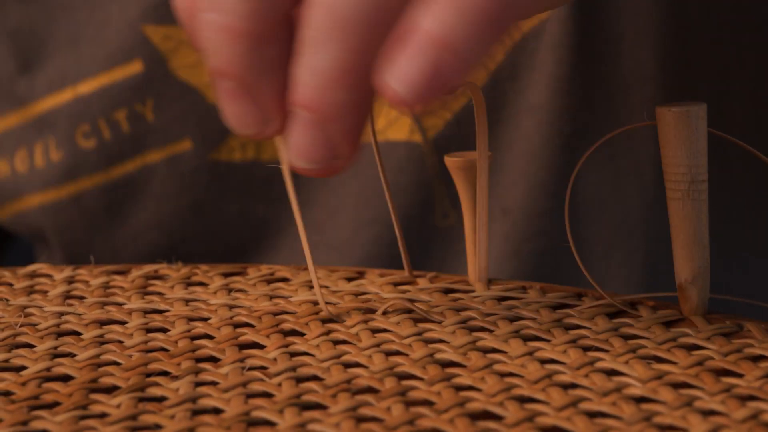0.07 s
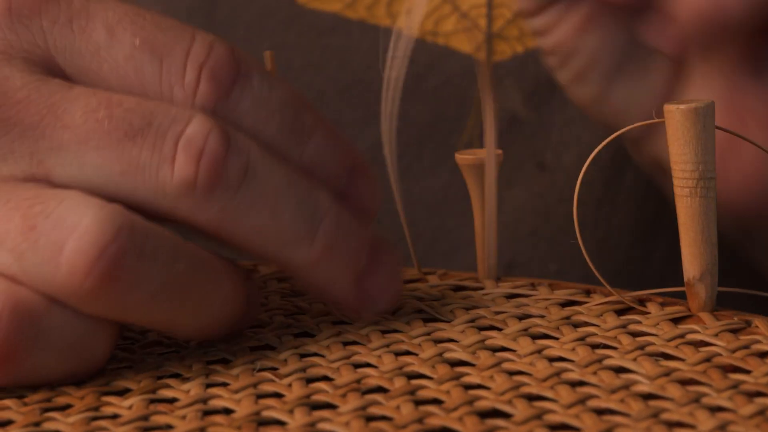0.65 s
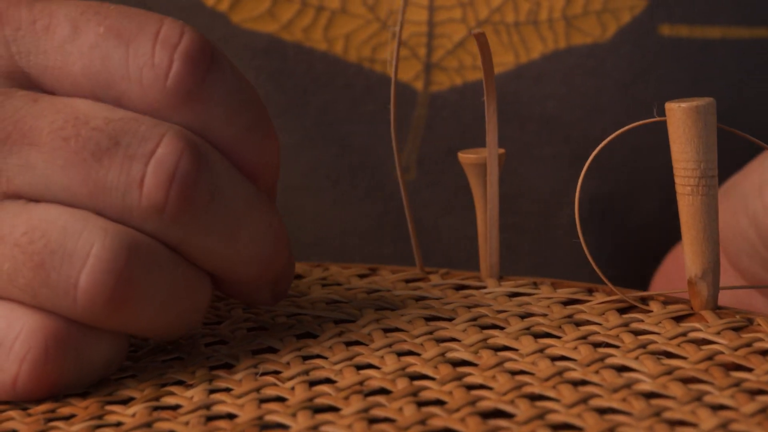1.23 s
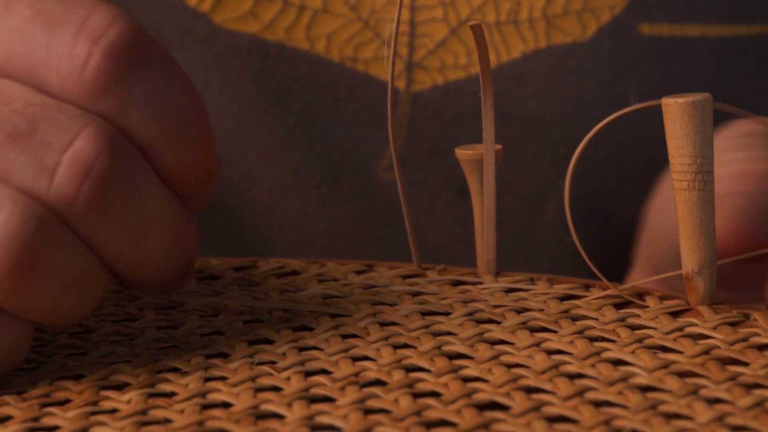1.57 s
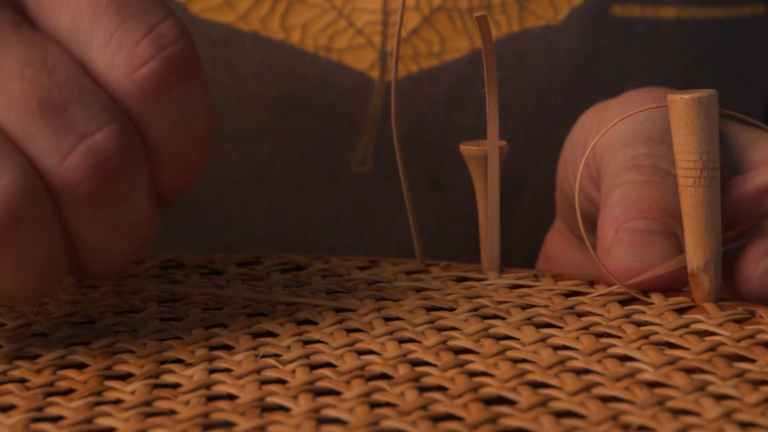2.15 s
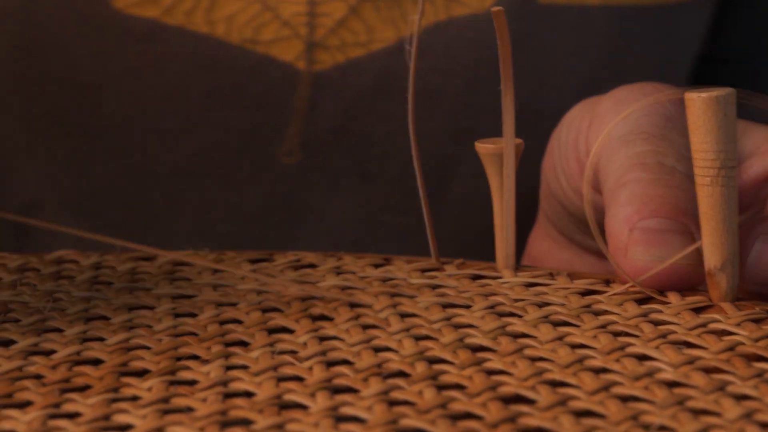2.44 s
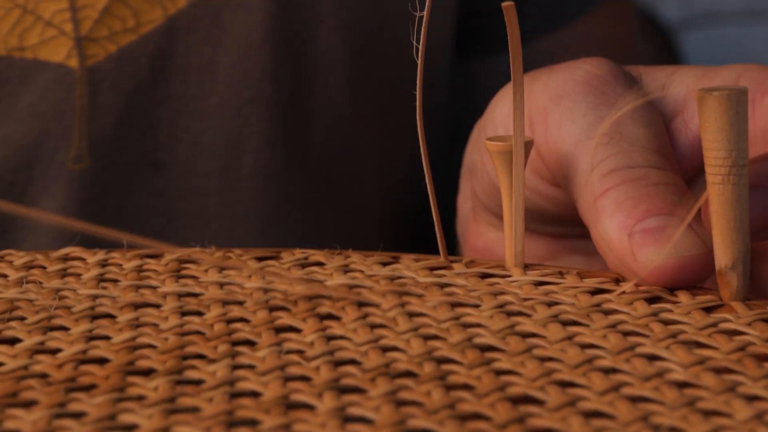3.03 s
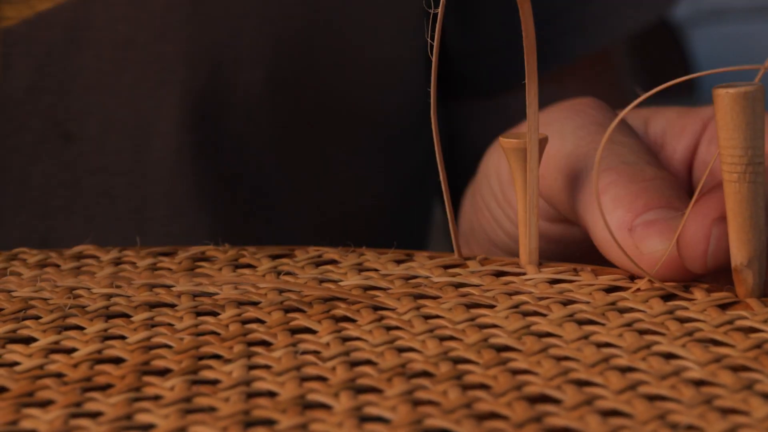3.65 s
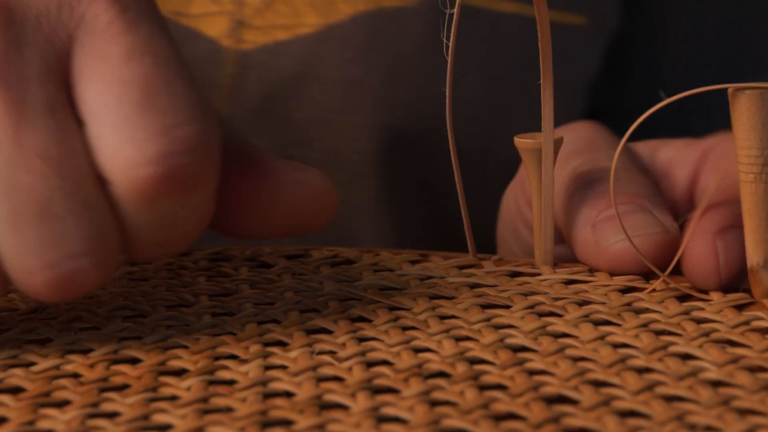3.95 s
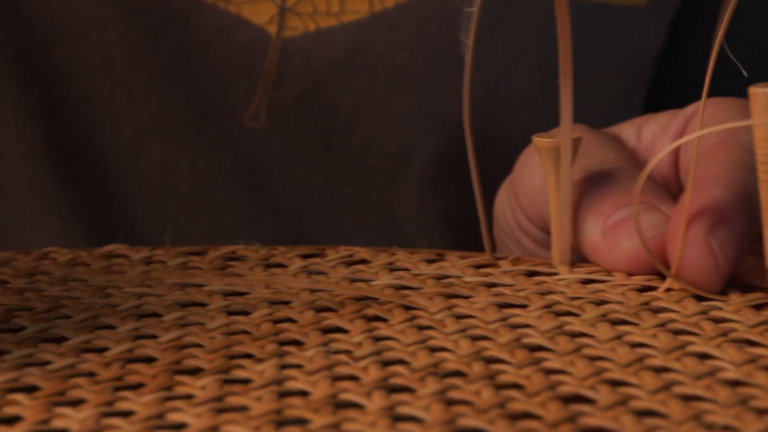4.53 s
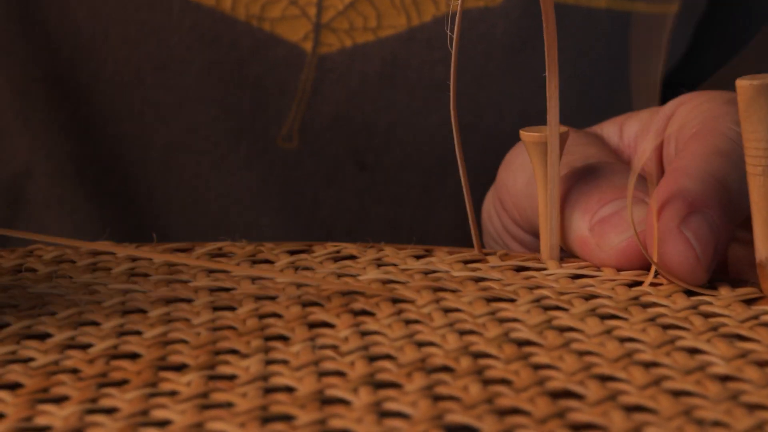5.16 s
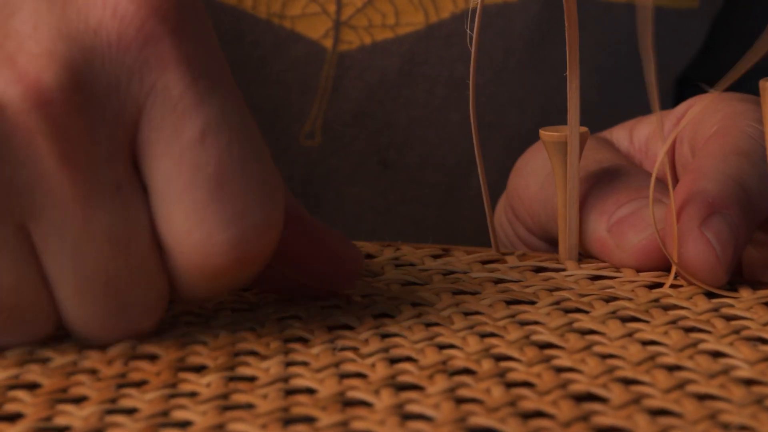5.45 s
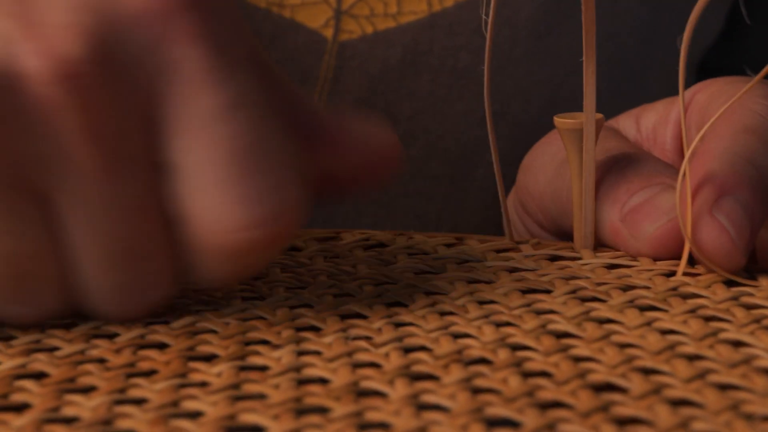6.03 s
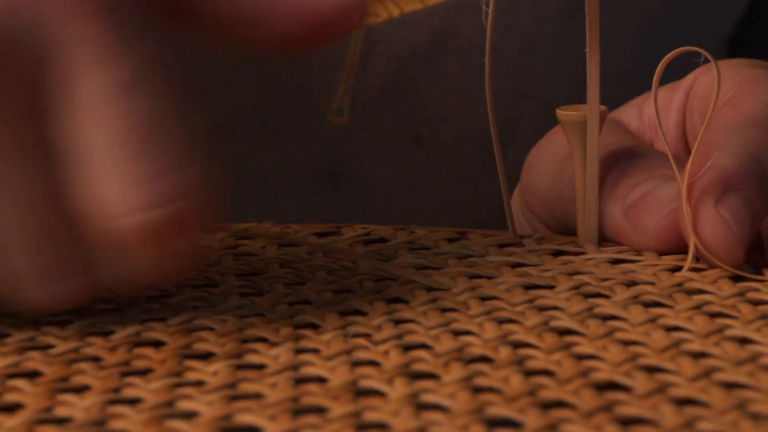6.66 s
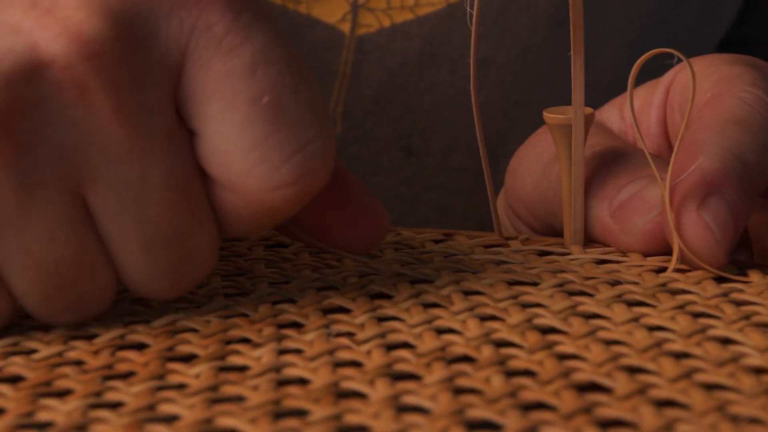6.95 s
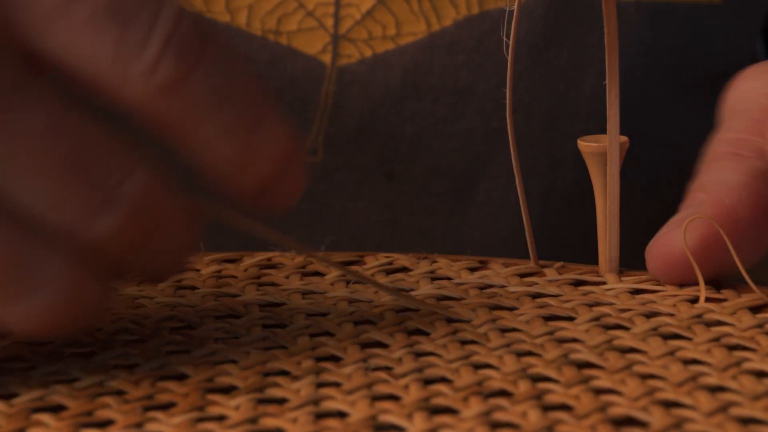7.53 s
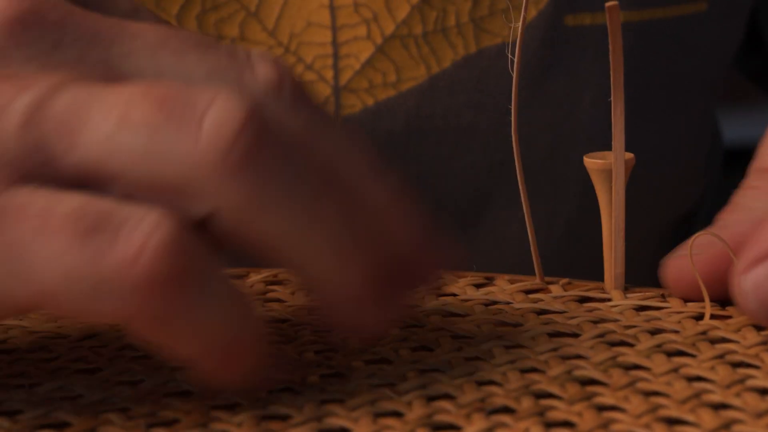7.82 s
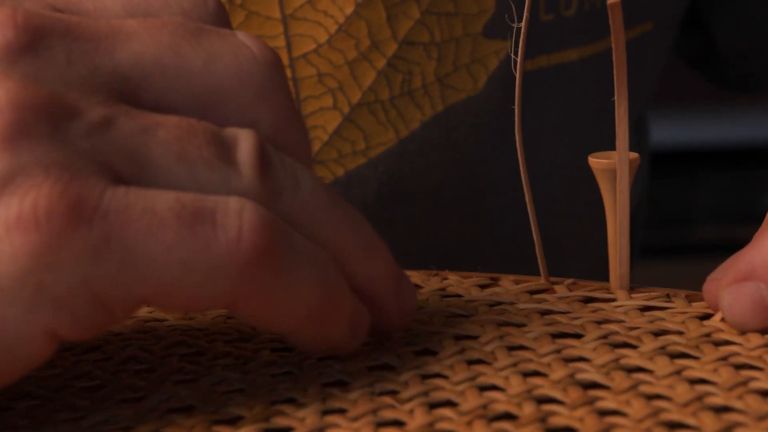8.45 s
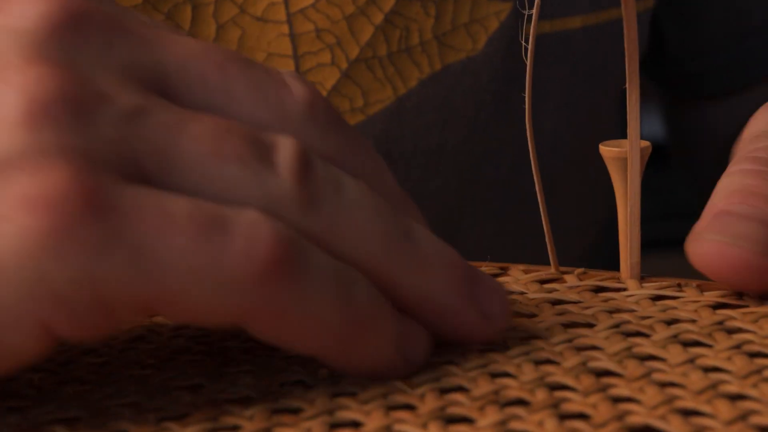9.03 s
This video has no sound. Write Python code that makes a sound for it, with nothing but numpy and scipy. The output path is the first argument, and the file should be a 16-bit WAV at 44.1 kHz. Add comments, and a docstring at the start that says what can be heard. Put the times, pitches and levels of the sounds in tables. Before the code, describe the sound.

Close to the microphone, cane sticks and slips through a taut chair seat. It starts with light brushing and scattered clicks, moves into a run of slow creaks, and squeals briefly about halfway. Several quicker, evenly spaced rasps follow, each making the seat resonate a little, and a quick crackle of snaps comes near the end. The workshop behind is quiet, with soft air and a deep, faint rumble.

```python
"""A thin cane strand is pulled through a woven chair seat, close up in a quiet workshop.
It sticks and slips: single snaps at first, then rasping pulls, one of which breaks into a squeal.
Every slip cracks, rings the strand and drums the taut weave, and the slip rate follows the hand's speed.
The loose end swishes between pulls. Underneath sit soft air, a deep rumble and a faint lamp buzz."""
import sys
import numpy as np
from scipy import signal
from scipy.fft import rfft, irfft, next_fast_len
from scipy.io import wavfile
from scipy.ndimage import uniform_filter1d, map_coordinates

SR = 44100
rng = np.random.default_rng(int(sys.argv[2]) if len(sys.argv) > 2 else 0)


def unload_audio(sound):
    """Save the sound as a 16-bit wav file, at the path given as the first command line argument."""
    columns = np.transpose(np.atleast_2d(sound))
    # keep every value between -1 and 1, then stretch to whole-number steps
    steps = np.round(np.clip(columns, -1, 1) * 32767)
    wavfile.write(sys.argv[1], SR, steps.astype(np.int16))


N = 409688
TIME = np.arange(N) / SR

# tone colour of the room's air: freq_hz, gain_db
AIR_SPECTRUM = [(35, -28.5), (60, 0), (149, -7), (244, -13.5), (323, -13.5), (363, -16), (715, -16),
                (903, -17.5), (1090, -20.5), (1910, -27.5), (2840, -29), (4320, -36.5), (10300, -40.5),
                (16000, -46.5)]
# faint steady notes in the room: pitch_hz, level_db
HUM_TONES = [(328.4, -72.5), (710.6, -71)]
# swells of the deep rumble: time_s, relative_level_db
RUMBLE_CURVE = [(0, -46.5), (1.42, -48.5), (1.92, -33), (2.15, -46), (2.75, -43), (3.5, -48.5),
                (5.17, -42.5), (8.57, -46), (8.85, -35.5), (9.29, -36)]
# tone colour of the lamp buzz: freq_hz, gain_db
LAMP_SPECTRUM = [(1200, -24.5), (2300, -4), (2850, 4.5), (3600, -5.5), (5200, 0), (8000, -3.5),
                 (10300, -1.5), (12000, -12.5), (16000, -18)]
# decay of the wall reflections: freq_hz, t60_s
WALL_DECAY = [(100, 1), (600, 0.14), (2000, 0.23), (4000, 0.62), (8000, 0.1), (15000, 0.27)]
# taut strands that sing on after a pull: centre_hz, width_hz, gain_db
SYMPATHY_BANDS = [(1280, 62, 2), (1960, 480, -2)]
# the loose end and the hand brush or nudge the seat: peak_s, length_s, relative_level_db, centre_hz
SWISHES = [(0.058, 0.022, -48.5, 2560), (.72, 0.044, -50, 11300), (1.103, 0.1, -58.5, 2800),
           (1.74, 0.053, -55.5, 5950), (3.469, .11, -66.5, 5000), (4.652, .1, -56.5, 3570),
           (5.229, 0.098, -55.5, 4822), (5.303, .092, -52.5, 3999), (5.314, 0.21, -40.5, 51.6),
           (5.25, .15, -49.5, 105.5), (5.975, 0.065, -56, 4500), (6.665, 0.052, -56.5, 5477),
           (8.047, 0.025, -57.5, 10750), (8.366, 0.077, -46, 79.4)]
# the strand's sung note: time_s, pitch_hz, relative_fundamental_db, relative_octave_db
SQUEAL_CURVE = [(4.172, 1413, -36, -46), (4.205, 1620, -25.5, -24), (4.245, 1660, -24, -23),
                (4.32, 1591, -27, -29.5), (4.35, 1438, -28, -25), (4.38, 1391, -35.5, -23.5),
                (4.405, 1307, -22.5, -23), (4.425, 1176, -27, -33), (4.445, 1075, -26.5, -33.5)]
# drum modes of the woven seat: pitch_hz, gain_db, t60_s
SEAT_MODES = [(71.5, -10, .3), (104.3, 0.5, 0.46), (139.5, -1, 0.37), (194.8, -5, 0.29), (228, -6, 0.29),
              (277, 2.5, 0.16), (336.4, 1.5, 0.15), (398.8, -5, 0.24)]
# modes of the neighbouring strands: pitch_hz, gain_db, t60_s
WEAVE_MODES = [(524, -6.5, 0.11), (600.7, -3.5, 0.089), (716.3, -3.5, 0.17), (798, -10, 0.15),
               (892, 2.5, 0.087), (979.6, -3.5, 0.14), (1071.5, -2, 0.12), (1199, 0, 0.093)]
# modes of the pulled strand: pitch_hz, gain_db, t60_s
STRAND_MODES = [(1427, -0.5, .03), (1664, 1, 0.022), (1825, -9.5, 0.066), (1900, -9, .03), (2222, 2, 0.024),
                (2651, 3, 0.025), (3170, 0, 0.021), (3460, -3, 0.018), (3930, -5, 0.023),
                (4560, -16, 0.035)]
# tone colour of a slip's crack: freq_hz, gain_db
CRACK_SPECTRUM = [(200, -23), (1200, -31), (3000, 4.5), (5000, 0.5), (7000, 1.5), (9000, 0), (12000, -7.5),
                  (15000, -7), (17000, -15)]
# lone snaps, levels before the mix trims: start_s, ring_db, crack_db, favoured_strand_hz, drum_re_ring_db
SNAPS = [(1.0604, -31, -42, 1930, -29), (1.117, -37.5, -53, 1930, -41), (1.1832, -47, -56.5, 1930, -34.5),
         (1.2005, -42, -54, 1930, -34), (1.3657, -23, -37, 1930, -41), (1.375, -28.5, -48, 1880, -39),
         (1.423, -20, -37.5, 1870, -40.5), (1.4364, -24, -43, 1960, -39), (1.698, -23, -33, 1886, -27.5),
         (1.8534, -23, -32, 1930, -27.5), (2.2052, -22.5, -33.5, 1860, -36),
         (2.3823, -22.5, -37, 1865, -24), (4.43, -21, -32, 2033, -17), (4.44, -21.5, -32.5, 2100, -12.5),
         (8.4, -19, -26, 2065, -34.5), (8.4569, -18, -24, 1980, -36), (8.4987, -18, -22, 1976, -36.5),
         (8.525, -19.5, -23, 1974, -30), (8.5429, -19.5, -26, 1940, -26.5),
         (8.5745, -26.5, -29.5, 1920, -23), (8.5894, -28.5, -32.5, 1920, -28),
         (8.6214, -27.5, -31.5, 1920, -33)]
# pulls, from slow creaks to fast rasps, levels before the mix trims:
#   start_s, end_s, mean_slips_per_s, run_up_s, speed_lost_share (negative: gained), closing_slide_share,
#   first_ring_db, last_ring_db, first_crack_db, last_crack_db, first_strand_hz, last_strand_hz,
#   weave_hz, drum_re_ring_db, rattle_share; strand and weave pitches pick the favoured modes
PULLS = [ (1.4988, 1.5743, 66, .001, .34, 0, -23.5, -25, -38, -37.5, 1920, 1870, 880, -27, 1),
         (2.2358, 2.3548, 76, .005, .34, 0, -26.5, -24.5, -38, -32.5, 1900, 1860, 573, -13.5, .95),
         (2.4449, 2.6127, 60, .01, .04, 0, -28.5, -29, -37, -31.5, 1900, 2065, 610, -11.5, 0.8),
         (2.7187, 2.8433, 56, .017, .46, 0, -28, -27, -31.5, -34, 2210, 2140, 600, -7.5, 0.65),
         (2.961, 3.2428, 92, .016, -.15, .27, -22.5, -27.5, -34, -32.5, 2083, 2200, 660, -14, 0.6),
         (3.25, 3.388, 104, .001, 0, .5, -21.5, -28.5, -32.5, -30, 2080, 2350, 660, -14, 0.64),
         (4.171, 4.3486, 130, .016, .02, 0, -25, -20.5, -33, -30.5, 1860, 1730, 800, -22.5, .9),
         (4.354, 4.425, 140, .001, 0, .95, -29, -32.5, -36.5, -37.5, 1800, 2004, 830, -7.5, 0.72),
         (4.9744, 5.1553, 155, .059, .28, 0, -20.5, -21.5, -33, -29.5, 2140, 1720, 740, -16.5, 0.27),
         (5.6625, 5.8005, 181, .011, .06, 0, -18, -18, -28.5, -26, 2063, 1880, 770, -10.5, 0.41),
         (6.3733, 6.5309, 152, .015, .68, 0, -18, -21.5, -25, -29, 2170, 1900, 916, -13, 0.041),
         (7.0455, 7.2082, 123, .059, .5, 0, -19, -24.5, -29.5, -32, 2270, 1987, 951, -14, 0.35),
         (8.3052, 8.3645, 67, .001, .28, 0, -22.5, -24, -29.5, -33.5, 2151, 1944, 1015, -22, 0.46)]

TOP_HZ = 16300
SLIP_S = .01  # slip levels refer to the energy stored over this time


def amp(db):
    """Decibels to gain."""
    return 10 ** (np.asarray(db) / 20)


def unit(x):
    """Scale to rms 1."""
    return x / np.sqrt(np.mean(x ** 2) + 1e-20)


def unit_energy(x):
    """Scale every row to energy 1."""
    return x / np.linalg.norm(x, axis=-1, keepdims=True)


def along(points, hz):
    """Read (freq_hz, value) points on a log frequency axis."""
    freqs, values = np.transpose(points)
    return np.interp(np.log(hz + 1), np.log(freqs + 1), values)


def automation(rows):
    """One curve across the scene for each column after time_s."""
    times, *columns = np.transpose(rows)
    return [np.interp(TIME, times, column) for column in columns]


def wobble(rate):
    """A smooth random curve, rate knots a second."""
    return map_coordinates(rng.standard_normal(int(N * rate / SR) + 4), [TIME * rate])


def filtered(x, response):
    """Equalise x with a gain over frequency."""
    size = next_fast_len(N + SR // 2)
    return irfft(rfft(x, size) * response(np.fft.rfftfreq(size, 1 / SR)), size)[:N]


def sharpest_click(spectrum, size=1024):
    """The tightest (minimum-phase) impulse with this tone colour."""
    cepstrum = irfft(np.log(amp(along(spectrum, np.fft.rfftfreq(size, 1 / SR)))))
    cepstrum[1:size // 2] *= 2
    cepstrum[size // 2 + 1:] = 0
    return irfft(np.exp(rfft(cepstrum)))[:size // 8]


def place(times, shapes):
    """Lay one short waveform on the track at each start time."""
    index = np.round(times * SR).astype(int)[:, None] + np.arange(shapes.shape[1])
    return np.bincount(index.ravel(), shapes.ravel(), N)[:N]


def room_tone(air_db=-59.5, rumble_hz=26, rumble_trim_db=-5):
    """The bed: soft air noise, a faint wavering hum and a deep uneven rumble."""
    air = unit(filtered(rng.standard_normal(N), lambda hz: amp(along(AIR_SPECTRUM, hz))))
    hum = sum(amp(db) * unit(np.sin(2 * np.pi * hz * TIME + .8 * wobble(35))) for hz, db in HUM_TONES)
    rumble = unit(filtered(rng.standard_normal(N), lambda hz: hz / (1 + (hz / rumble_hz) ** 6)))
    return amp(air_db) * air + hum + amp(automation(RUMBLE_CURVE)[0] + rumble_trim_db) * rumble


def lamp_buzz(level_db=-78, mains_hz=60, skew_s=.00005):
    """A lamp ticks each half cycle of the mains, slightly unevenly, smeared by the room."""
    half_cycle = np.arange(int(N / SR * 2 * mains_hz))
    times = half_cycle / (2 * mains_hz) + skew_s * (half_cycle % 2)
    ticks = place(times, (-1.) ** half_cycle[:, None] * rng.standard_normal(1024))
    return amp(level_db) * unit(filtered(ticks, lambda hz: amp(along(LAMP_SPECTRUM, hz))))


def workshop_reverb(x, near_db=-21, tail_db=-24, near_t60_s=.22):
    """The chair and bench answer at once, the walls with a faint tail."""
    hz, t, noise = signal.stft(rng.standard_normal(SR), SR, nperseg=256)
    decay = amp(-60 * t / along(WALL_DECAY, hz)[:, None])
    tail = signal.istft(noise * decay, SR, nperseg=256)[1][:SR]
    near = rng.standard_normal(SR) * amp(-60 * TIME[:SR] / near_t60_s)
    response = amp(near_db) * unit_energy(near) + amp(tail_db) * unit_energy(tail)
    return signal.fftconvolve(x, np.pad(response, (SR // 200, 0)))[:N]  # 5 ms pre-delay


def sympathetic_strands(x, level_db=-29, t60_s=.6):
    """Other taut strands pick up the scrape and hold it in narrow bands."""
    def bands(f):
        return sum(amp(db) * np.exp(-.5 * ((f - hz) / width) ** 2) for hz, width, db in SYMPATHY_BANDS)
    ring = filtered(rng.standard_normal(N), bands)[:SR] * amp(-60 * TIME[:SR] / t60_s)
    return amp(level_db) * signal.fftconvolve(x, unit_energy(ring))[:N]


def swishes(log_width=.46, grain_db=7, trim_db=-1.5):
    """Light grainy brushing: the loose end ticks over the weave, the hand rubs it with a dull murmur."""
    out = np.zeros(N)
    t = np.arange(-SR // 4, SR // 4) / SR
    freqs = np.fft.rfftfreq(len(t), 1 / SR) + 1
    grains = rng.standard_normal(N) * amp(grain_db * wobble(500))
    for peak_s, length_s, level_db, centre_hz in SWISHES:
        index = np.round((peak_s + t) * SR).astype(int)
        band = np.exp(-.5 * (np.log(freqs / centre_hz) / log_width) ** 2)
        brush = unit(irfft(rfft(grains[index]) * band, len(t)))
        swish = amp(level_db + trim_db) * brush * np.exp(-2 * (t / length_s) ** 2)
        out[index[index >= 0]] += swish[index >= 0]
    return out


def squeal(trim_db=2.5, roughness=.048, flutter_db=0.0, overtone_db=-15):
    """Sliding fast, the strand locks onto one rough note that lifts, then sinks as its free length grows."""
    hz, fundamental_db, octave_db = automation(SQUEAL_CURVE)
    phase = 2 * np.pi * np.cumsum(hz * (1 + roughness * wobble(600))) / SR
    singing = (TIME > SQUEAL_CURVE[0][0]) & (TIME < SQUEAL_CURVE[-1][0])
    gate = uniform_filter1d(singing * 1., size=200)
    upper = np.sin(2 * phase) + amp(overtone_db) * (np.sin(3 * phase) + .5 * np.sin(6 * phase))
    note = amp(fundamental_db) * np.sin(phase) + amp(octave_db) * upper
    return gate * amp(trim_db + flutter_db * wobble(250)) * note


def seat_drum(pushes, attack_s=.007):
    """The taut seat rings on, and swells when the slip rate meets one of its modes."""
    t = TIME[:SR // 2]
    ring = sum((-1) ** k * amp(db - 60 * t / t60) * np.sin(2 * np.pi * hz * t)
               for k, (hz, db, t60) in enumerate(SEAT_MODES))
    return signal.fftconvolve(pushes, unit_energy(ring * (1 - np.exp(-t / attack_s))))[:N]


def strand_rings(modes, favoured_hz, size, focus_db, log_width, spread_db, detune, bend_power=.08):
    """One ring of energy 1 per slip; modes near that slip's favoured pitch are lifted."""
    t = TIME[:size]
    draws = rng.standard_normal((len(favoured_hz), len(modes), 2))
    out = np.zeros((len(favoured_hz), size))
    # a shorter free length also bends all modes a little upward
    bend = (favoured_hz / np.median(favoured_hz))[:, None] ** bend_power
    for k, (hz, db, t60) in enumerate(modes):
        lift_db = focus_db * np.exp(-.5 * (np.log(hz / favoured_hz[:, None]) / log_width) ** 2)
        pitch_hz = hz * bend * (1 + detune * draws[:, k, :1])
        gain = amp(db + lift_db + spread_db * draws[:, k, 1:])
        out -= (-1) ** k * gain * np.sin(2 * np.pi * pitch_hz * t) * amp(-60 * t / t60)
    return unit_energy(out)


def cracks(times, rattle_share, hold_s=.0025, fresh_gain=.61, drift_per_s=14, size=512):
    """A sharp release, then a few milliseconds of echoes along the strand that change as it travels."""
    patterns = rng.standard_normal((int(N / SR * drift_per_s) + 3, size))
    step, part = np.divmod(times * drift_per_s, 1)
    step, crossfade = step.astype(int), part[:, None] * np.pi / 2
    echoes = np.cos(crossfade) * patterns[step] + np.sin(crossfade) * patterns[step + 1]
    echoes += fresh_gain * rng.standard_normal(echoes.shape)
    echoes /= 1 + (TIME[:size] / hold_s) ** 3
    burst = np.sqrt(rattle_share)[:, None] * unit_energy(echoes)
    burst[:, 0] = -np.sqrt(1 - rattle_share)  # the release takes the rest of the energy
    return unit_energy(signal.fftconvolve(burst, sharpest_click(CRACK_SPECTRUM)[None], axes=1))


def softened(clicks, level_db, bright_db=-33, dulling=2.2):
    """Gentle slips let go more slowly, so their cracks are duller."""
    treble = np.minimum(np.fft.rfftfreq(clicks.shape[1], 1 / SR) / TOP_HZ, 1) ** 2
    tilt_db = np.clip(dulling * (level_db - bright_db), -20, 0)[:, None] * treble
    return unit_energy(irfft(rfft(clicks) * amp(tilt_db), clicks.shape[1]))


def slip_times(start, end, rate, run_up_s, speed_lost, start_lag=.8):
    """The hand gathers speed, then mostly eases off; the strand lets go after every equal length drawn."""
    t = np.linspace(0, end - start, num=SR // 100)
    speed = (1 - start_lag * np.exp(-t / run_up_s)) * (1 - speed_lost * (t / t[-1]) ** 2)
    drawn = np.cumsum(speed) - speed[0]
    release_points = np.linspace(0, drawn[-1], round(rate * t[-1]) + 1)
    return start + np.interp(release_points, drawn, t)


def pull(row, jitter_s=.00006, scatter_db=1.0, fibres_per_s=600, let_go_s=.021, slack_db=7.5, tighten_s=.03):
    """One pull: main slips with small fibres catching between them, which take over if the strand slides."""
    start, end, rate, run_up_s, speed_lost, slide_share = row[:6]
    ring_db, crack_db, strand_hz = row[6:8], row[8:10], row[10:12]  # (first, last) pairs
    weave_hz, drum_db, rattle_share = row[12:]
    length_s = end - start
    slips = slip_times(start, end, rate, run_up_s, speed_lost)
    fibres = rng.uniform(start, end, int(length_s * fibres_per_s))
    times = np.concatenate([slips + jitter_s * rng.standard_normal(len(slips)), fibres])
    sliding = np.clip((times - end + slide_share * length_s) / let_go_s, 0, 1)
    friction = np.interp(sliding, [0, 1], [.09, .85])  # fibres' share of the energy: ratcheting, sliding
    # each slip releases the energy stored since the one before
    gaps = np.diff(slips)
    slip_stored_s = np.r_[gaps[0], gaps] * (1 - friction[:len(slips)])
    stored_s = np.r_[slip_stored_s, friction[len(slips):] / fibres_per_s]
    share_db = 10 * np.log10(stored_s / SLIP_S) + scatter_db * rng.standard_normal(len(times))
    age_s = np.maximum(times - start, 0)
    glide = lambda first, last: first + (last - first) * (age_s / length_s) ** .7
    drum_db = drum_db - slack_db * np.exp(-age_s / tighten_s)  # less drum until the strand draws tight
    return np.column_stack(np.broadcast_arrays(
        times, glide(*ring_db) + share_db, glide(*crack_db) + share_db,
        glide(*strand_hz), drum_db, weave_hz, rattle_share))


def cane_slips(ring_trim_db=-1.05, crack_trim_db=1.54, weave_trim_db=-4.0, seat_trim_db=2.0):
    """Every slip cracks and sounds through the strand, its neighbours and the seat."""
    snaps = [(*row, 960, 1) for row in SNAPS]  # lone snaps favour the weave at 960 Hz and rattle fully
    slips = np.vstack([snaps] + [pull(row) for row in PULLS])
    times, ring_db, crack_db, strand_hz, drum_db, weave_hz, rattle_share = slips.T
    strength = lambda db: amp(db)[:, None] * np.sqrt(SLIP_S * SR)
    strand = strength(ring_db + ring_trim_db) * strand_rings(
        STRAND_MODES, strand_hz, size=1400, focus_db=8.5, log_width=.15, spread_db=1.5, detune=.019)
    crack = strength(crack_db + crack_trim_db) * softened(cracks(times, rattle_share), crack_db)
    # the neighbours sit between strand and seat, so they take half the drum's level offset
    weave = strength(ring_db + drum_db / 2 + weave_trim_db) * strand_rings(
        WEAVE_MODES, weave_hz, size=2400, focus_db=10.0, log_width=.19, spread_db=5.0, detune=.018)
    seat = seat_drum(place(times, strength(ring_db + drum_db + seat_trim_db)))
    return place(times, strand) + place(times, crack) + place(times, weave) + seat


def scene():
    """The mono mix: cane work up front, its resonances and the room behind."""
    work = cane_slips() + squeal() + swishes()
    return (work + sympathetic_strands(work) + workshop_reverb(work) + room_tone() + lamp_buzz())[None]


def record(dry):
    """Clip at full scale and roll off steeply at the top of the band."""
    high_cut = lambda hz: np.clip((TOP_HZ - hz) / 700 + .5, 0, 1) ** 2
    return filtered(np.clip(dry[0], -1, 1), high_cut)[None]


dry = scene()
out = record(dry)
unload_audio(out)
```